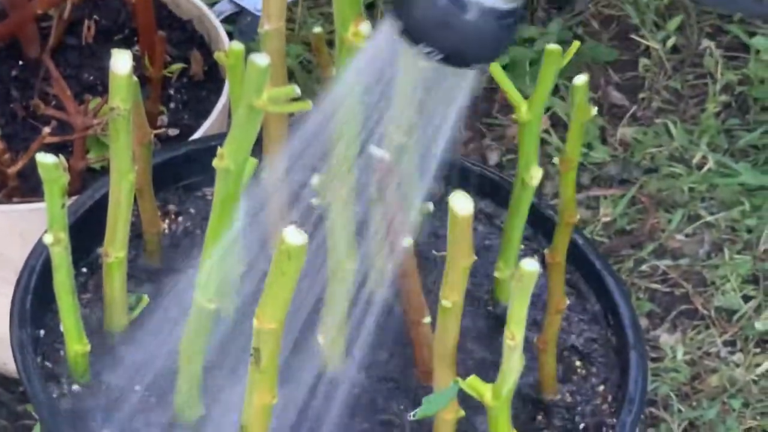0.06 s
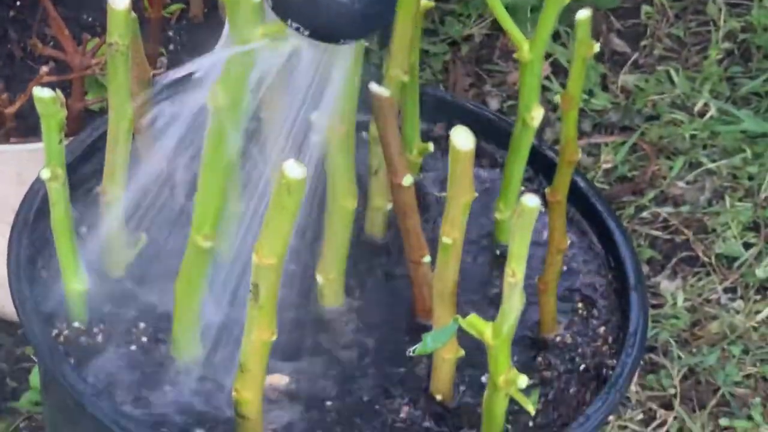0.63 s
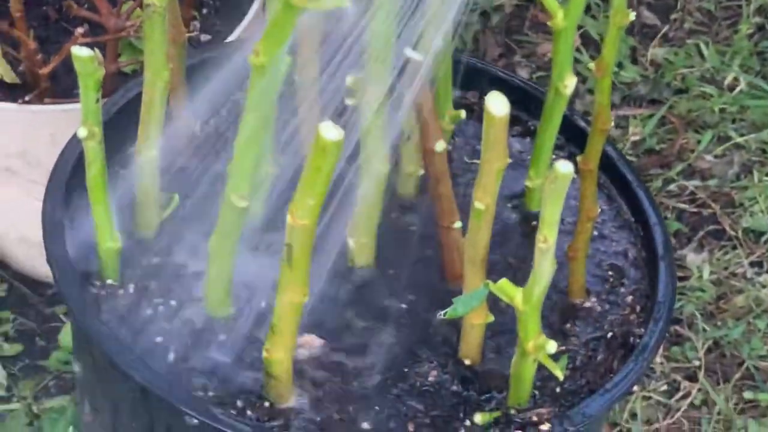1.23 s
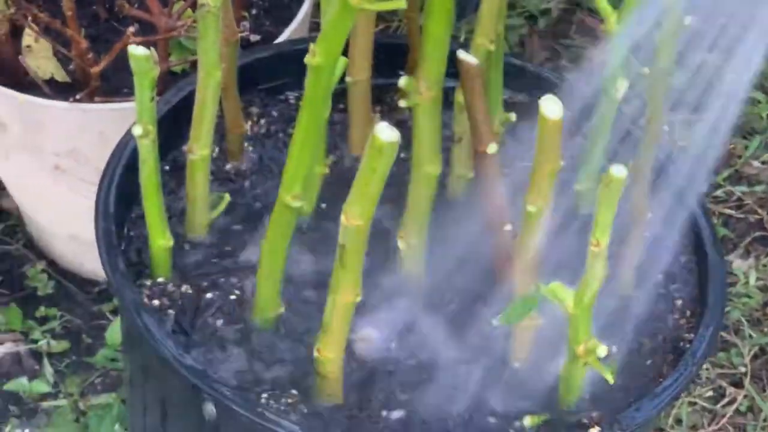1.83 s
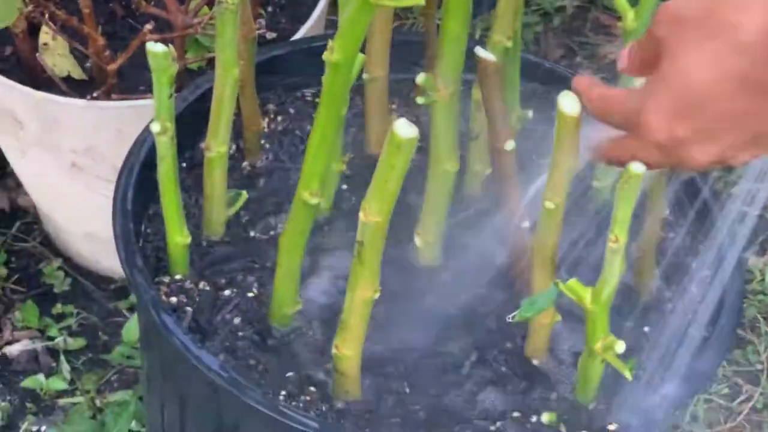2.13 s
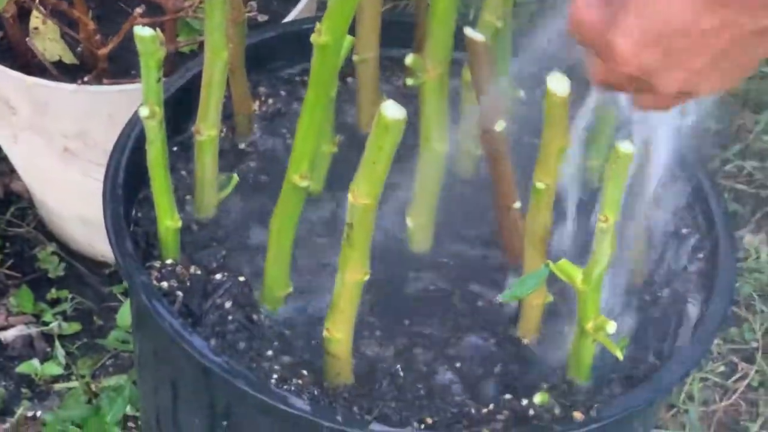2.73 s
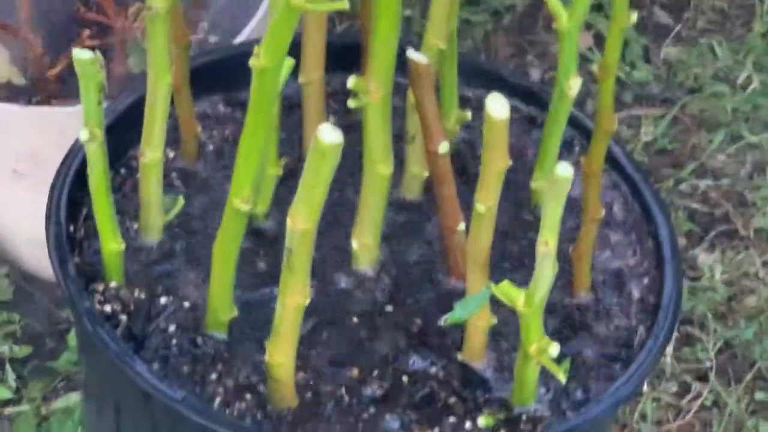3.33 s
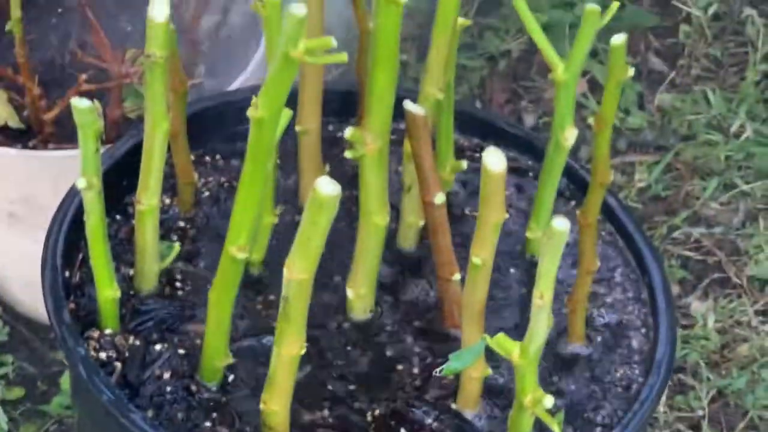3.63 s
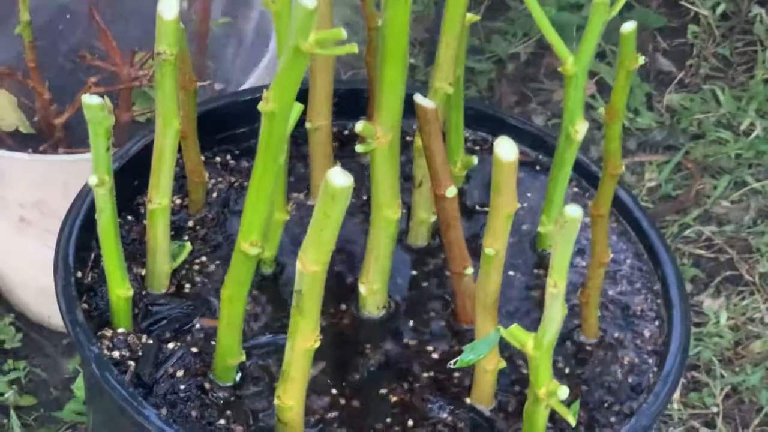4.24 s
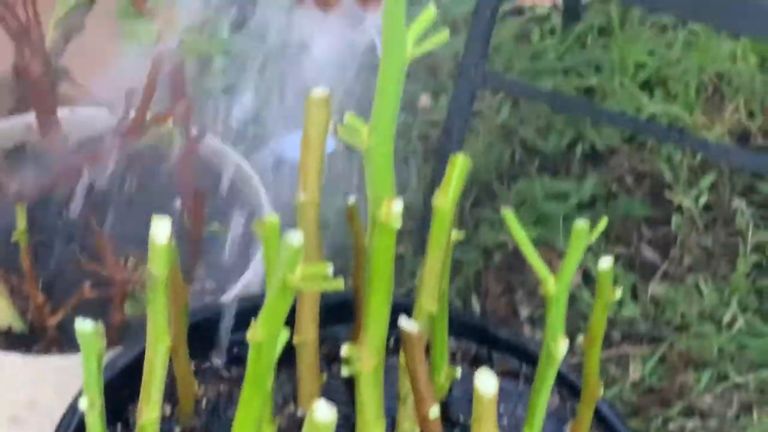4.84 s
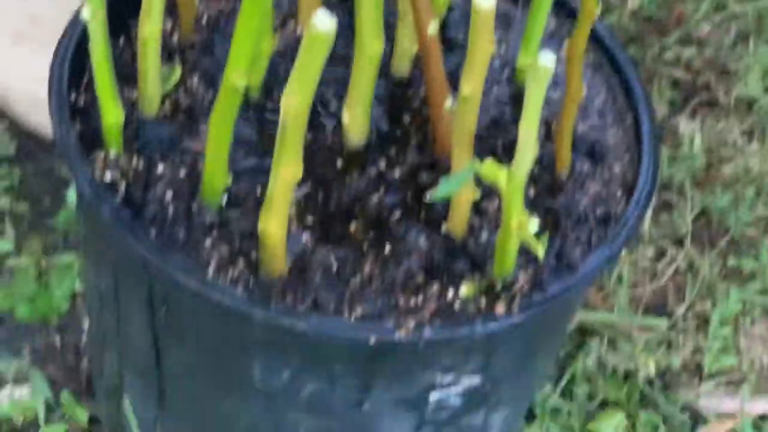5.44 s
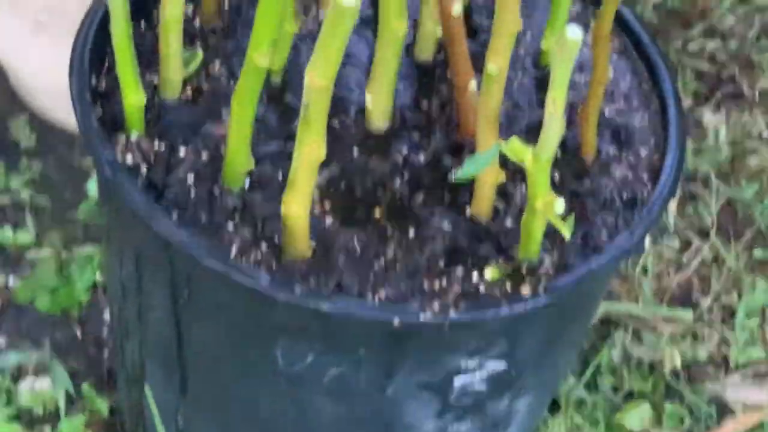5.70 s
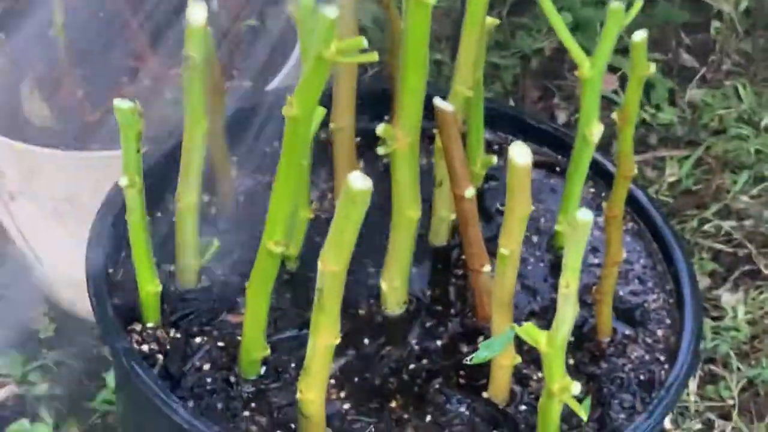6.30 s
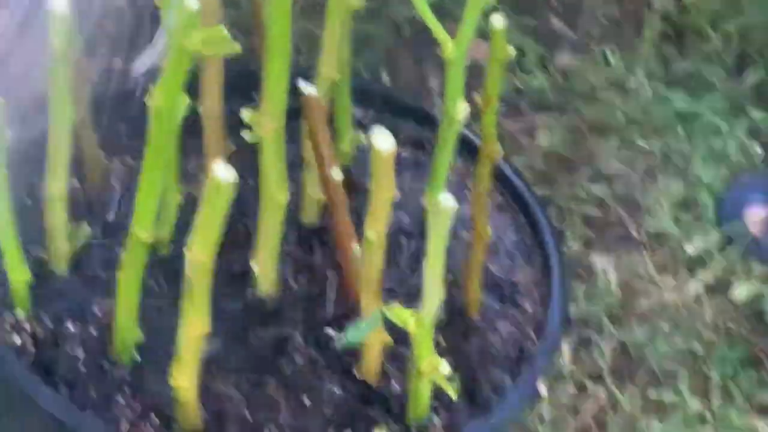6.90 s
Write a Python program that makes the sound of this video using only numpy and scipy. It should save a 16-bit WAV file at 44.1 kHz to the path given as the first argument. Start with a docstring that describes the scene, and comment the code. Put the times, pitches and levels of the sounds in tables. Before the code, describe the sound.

Outdoors, close to the microphone, a garden shower head sprays a plastic pot of plant cuttings with a bright hiss and a patter on wet soil. The water rings against the pot's wall, then gurgles and plops as it pools. About halfway the spray swings to a farther pot and softens, with short swishes and ticking drops, before growing a little again. Distant traffic and an engine hum faintly underneath.

```python
"""A garden shower head sprays a plastic pot of cuttings outdoors, over far traffic and an engine's drone.
From the start, fine drops hiss on stems and wet soil, and the pot's resonances colour their patter.
Towards 2 s the jets reach the wall, which rings; then pooling water gurgles and big drops plop.
At about 3.2 s the spray swings to a farther pot and softens, leaving a few plops behind.
From 5 s the engine fades, and swishes, as of jets crossing a rim or leaves, come more often."""
import sys
import numpy as np
from scipy import signal
from scipy.fft import rfft, irfft, next_fast_len
from scipy.io import wavfile
from scipy.ndimage import uniform_filter1d, map_coordinates

SR = 44100
rng = np.random.default_rng(int(sys.argv[2]) if len(sys.argv) > 2 else 0)


def bounce(signal):
    """Save signal as a 16-bit WAV file at the path given by the first command-line argument."""
    frames = np.transpose(np.atleast_2d(signal))
    limited = np.clip(frames, -1, 1)
    pcm = np.round(limited * 32767).astype(np.int16)
    wavfile.write(sys.argv[1], SR, pcm)


N = 311427

# the shower as the hand moves it: t/s, spray level/dB, splash re spray/dB, drumming re spray/dB
SHOWER = [(0.0, -27.5, -6, -18), (0.25, -26.3, -7.5, -13.5), (0.45, -28, -7, -15), (0.7, -28.0, -7, -17),
          (0.87, -30.5, -7, -14), (0.97, -28, -5, -15.5), (1.12, -27.5, -6, -16.5),
          (1.3, -28.0, -6.5, -12.5), (1.5, -27.5, -6, -15.5), (1.64, -29.0, -6.5, -15),
          (1.76, -27, -6.5, -18), (1.94, -27.5, -6.5, -17.5), (2.08, -29.5, -5.5, -17), (2.2, -30, -5, -14),
          (2.45, -29.5, -6, -13), (2.7, -30.5, -4, -11.5), (2.9, -31.5, -5.5, -12.5),
          (3.02, -31.5, -7.5, -20), (3.12, -33, -5.5, -12.5), (3.19, -39, -4, -15.5), (3.28, -37, -3, -17),
          (3.38, -39, -10.5, -15), (3.48, -41.5, -11, -14.5), (3.57, -38, -9.5, -8.5),
          (3.76, -36.5, -11, -14.5), (3.92, -35.5, -8.5, -13), (4.1, -36, -10, -14.5),
          (4.26, -34, -10.5, -17.5), (4.39, -34, -11.5, -17.5), (4.55, -37, -9.5, -16.5),
          (4.64, -39.5, -9.5, -13), (4.78, -34.5, -11.5, -19.5), (5.0, -34, -13, -16.5),
          (5.1, -36, -9, -19), (5.17, -41, -6.5, -10.5), (5.23, -40.5, -4.5, -13.5),
          (5.33, -38.5, -3.5, -13), (5.4, -43, -7.5, -7), (5.47, -40, -2.5, -11), (5.56, -43, -6, -12),
          (5.67, -36, -5, -15), (5.81, -36, -5.5, -12.5), (5.92, -32.5, -11, -18),
          (6.19, -32, -13.5, -18.5), (6.28, -32.5, -6, -15), (6.45, -30.5, -11, -17.5),
          (6.55, -34, -9.5, -17), (6.63, -31.5, -9.0, -17.5), (6.73, -36.5, -5.5, -16.5),
          (6.81, -35.5, -4.5, -21), (6.89, -38, -5, -16.5), (7.02, -32.5, -2, -17.5),
          (7.06, -33.5, -10, -7.5)]
# colour of a drop's tick: f/Hz, gain/dB
TICK_SPECTRUM = [(800, -22), (2000, -10), (4000, -6), (8000, -1), (12000, 0), (15000, -1)]
# stereo images of the near pot and of its wall: f/Hz, coherence (0-1), phase lead of left/rad
NEAR_POT_IMAGE = [(1100, .98, 0), (1550, .94, .4), (2000, .85, 1.1), (2450, .95, .1), (2880, .83, 3.5)]
WALL_IMAGE = [(3000, .6, 2.1), (4140, .92, .45), (5100, .45, 1.7), (6300, .65, .9), (7000, .97, 0),
              (7700, .9, -1.2), (8600, 1, -3.1)]


def amp(db):
    """Amplitude ratio of a level in decibels."""
    return 10 ** (np.asarray(db) / 20)


def unit(x):
    """Normalisation to rms 1."""
    return x / np.sqrt(np.mean(x ** 2) + 1e-20)


def curves(rows):
    """Linear interpolation in time: one value per sample for each column after t/s."""
    times, *columns = np.transpose(rows)
    return [np.interp(np.arange(N) / SR, times, column) for column in columns]


def wobble(rate):
    """Slow random modulation: a spline through rate Gaussian knots a second."""
    knots = rng.standard_normal(int(N * rate / SR) + 4)
    return map_coordinates(knots, [np.arange(N) * rate / SR])


def swell(middle_s, length_s):
    """A half-cosine envelope, rising from 0 to 1 and falling back."""
    return np.cos(np.pi * np.clip((np.arange(N) / SR - middle_s) / length_s, -.5, .5))


def add(track, start_s, sound):
    """Superposition of a sound on a track."""
    start = int(np.clip(round(start_s * SR), 0, N - 1))
    track[start:start + len(sound)] += sound[:N - start]


def filtered(x, response):
    """Linear filtering: the spectrum is multiplied by a complex frequency response."""
    size = next_fast_len(N + 8192)
    return irfft(rfft(x, size) * response(np.fft.rfftfreq(size, 1 / SR)), size)[..., :N]


def coloured(x, spectrum):
    """Spectral shaping by (f/Hz, gain/dB) points on a logarithmic frequency axis."""
    f, db = np.transpose(spectrum)
    return filtered(x, lambda hz: amp(np.interp(np.log(hz + 1), np.log(f), db)))


def resonant(x, centre_hz, width_hz):
    """Two equal resonators in cascade give a steep-sided band, at rms 1."""
    peak = signal.iirpeak(centre_hz, centre_hz / width_hz, SR)
    return unit(signal.lfilter(*peak, signal.lfilter(*peak, x)))


def patchy(pair, depth_db, bins=5, frames=16):
    """Spectral modulation: random gains, smooth in frequency and time, keep the colour shifting."""
    spectra = signal.stft(pair, nperseg=512)[2]
    field = uniform_filter1d(rng.standard_normal(spectra.shape[1:]), bins, 0)
    field = uniform_filter1d(field, frames, 1)
    return signal.istft(spectra * amp(depth_db * unit(field)), nperseg=512)[1][:, :N]


def stereo(pair, image):
    """Partial coherence: two independent signals mix into phase-shifted left and right, at rms 1."""
    f, coherence, phase = np.transpose(image)
    angle = lambda hz: np.arccos(np.clip(np.interp(hz, f, coherence), 0, 1)) / 2
    shift = lambda hz: np.exp(.5j * np.outer([1, -1], np.interp(hz, f, phase)))
    shared, apart = filtered(pair, lambda hz: np.array([np.cos(angle(hz)), np.sin(angle(hz))]))
    return unit(filtered(np.array([shared + apart, shared - apart]), shift))


def impacts(rate, spread_db):
    """Shot noise: two streams, each of about rate impacts a second, log-normal in size."""
    hits = rng.random((2, N)) < rate / SR
    return unit(hits * rng.choice([-1, 1], (2, N)) * amp(spread_db * rng.standard_normal((2, N))))


def bubbles(rate, centre_hz, cycles, spread_db):
    """Two streams of tiny bubbles: damped oscillators that glide up, losing 60 dB in about cycles."""
    t = np.arange(SR // 50) / SR
    starts = rng.integers(0, 2 * N, int(rate * N / SR) * 2)
    pitch, size = rng.standard_normal((len(starts), 2)).T[:, :, None]
    turns = centre_hz * np.exp(.35 * pitch) * t
    age = np.minimum(turns / cycles, 2)
    rings = amp(spread_db * size - 60 * age) * np.sin(2 * np.pi * turns * (1 + .27 * age))
    samples = starts[:, None] + np.arange(len(t))
    summed = np.bincount(samples.ravel(), rings.ravel(), 2 * N)
    return unit(summed[:2 * N].reshape(2, N))


def far_share():
    """Power crossfade: the share of the spray that has swung to the farther pot, 0-1."""
    middle_s, takes_s = 3.22, .17
    return np.clip(.5 + (np.arange(N) / SR - middle_s) / takes_s, 0, 1)


def wall_share():
    """Power crossfade: the share of the splash that comes from close to the pot's wall, 0-1."""
    aim = [(0, 0.02), (.9, .05), (1.6, 0.3), (1.78, .9), (2.9, .9), (3.15, 0.4), (3.6, 0.09), (7.06, 0.11)]  # where the jets land: t/s, share near the wall
    return np.clip(curves(aim)[0], 0, 1)


def drumming():
    """Amplitude modulation: the force of the drops on soil wavers with the hand."""
    spray_db, _, drumming_db = curves(SHOWER)
    return amp(spray_db + drumming_db + .7 * wobble(26))


def traffic():
    """Far traffic rumbles as broadband noise with most of its power at low frequencies."""
    spectrum = [(20, -18), (32, -21), (45, -5), (58, 0.5), (85, 0), (130, -8), (200, -14), (320, -19),
                (450, -17.5), (680, -21), (930, -13.5), (1500, -19), (4000, -32), (15000, -53)]  # f/Hz, relative level/dB
    image = [(70, 0.96, 0.25), (270, 0.9, 0.23), (547, 0.34, 0.38), (900, 0.83, 0.25), (2500, 0.091, 0.47)]  # f/Hz, coherence, phase lead of left/rad
    noise = patchy(rng.standard_normal((2, N)), depth_db=1.2, bins=3, frames=40)
    return amp(-49) * stereo(coloured(noise, spectrum), image)


def engine():
    """Periodic firing makes a distant engine drone; the unsteady tone barely swells, then fades."""
    peak_db, peak_s, rise_db_per_s, fall_db_per_s = -53, 4.95, .1, 6
    past_s = np.arange(N) / SR - peak_s
    level_db = peak_db + np.minimum(rise_db_per_s * past_s, -fall_db_per_s * past_s)
    firing_hz = 91 + 3.31 * wobble(9)
    return amp(level_db + .86 * wobble(10)) * np.sin(2 * np.pi * np.cumsum(firing_hz) / SR)


def stray_drops():
    """Small drops strike rims and stems at random: brief noise bursts, panned at constant power."""
    per_s, loudest_db, range_db, t60_s = 60, -30, 8, .004
    t = np.arange(SR // 100) / SR
    left, right = np.zeros((2, N))
    for moment, weakness, side in rng.random((int(per_s * N / SR), 3)):
        tick = amp(loudest_db - range_db * weakness - 60 * t / t60_s) * rng.standard_normal(len(t))
        add(left, moment * N / SR, np.sqrt(1 - side) * tick)
        add(right, moment * N / SR, np.sqrt(side) * tick)
    return coloured(np.array([left, right]), TICK_SPECTRUM)


def stem_snaps():
    """Heavy drops snap on a stem: a short impact has a broad spectrum."""
    strikes = [(1.056, -27), (1.117, -22), (3.557, -25.5), (3.813, -29), (4.202, -28), (4.762, -28),
               (4.991, -23.5), (5.411, -32), (5.506, -30), (5.608, -27.5), (7.022, -20)]  # t/s, level before colouring/dB
    t60_s = .006
    t = np.arange(SR // 8) / SR
    track = np.zeros(N)
    for start_s, db in strikes:
        add(track, start_s, amp(db - 60 * t / t60_s) * rng.standard_normal(len(t)))
    return coloured(track, TICK_SPECTRUM)


def plops():
    """Bubble resonance: a big drop traps air in a puddle, which rings down with rising pitch."""
    drops = [(1.924, -39, 1240, 0.053), (2.523, -31, 1560, 0.025), (2.709, -34, 1230, 0.03),
             (2.815, -32, 2010, 0.03), (2.878, -33, 1400, .02), (2.927, -30, 1710, 0.028),
             (3.128, -36, 2050, 0.035), (3.147, -32.5, 2140, 0.022), (3.173, -29, 2440, 0.026),
             (3.225, -34, 1510, 0.045), (3.554, -40, 1590, 0.08), (3.683, -36, 1680, 0.03),
             (3.892, -37, 2000, 0.025), (6.248, -35, 1370, .03)]  # t/s, level/dB, starting f/Hz, 60 dB decay time/s
    attack_s = .00027
    t = np.arange(SR // 8) / SR
    track = np.zeros(N)
    for start_s, db, hz, t60_s in drops:
        envelope = amp(db - 60 * t / t60_s) * (1 - np.exp(-t / attack_s))
        add(track, start_s, envelope * np.sin(2 * np.pi * hz * t * (1 + .16 * t / t60_s)))
    return track


def swishes():
    """Band-limited shot noise swells over a weak hollow tone, as of jets crossing rims and leaves."""
    sweeps = [(.94, .08, -41.5, 2700, 1400), (.95, .1, -41.5, 4900, 3000), (1.76, .05, -38, 5200, 3000),
              (2.16, .06, -43, 2450, 700), (2.71, .11, -50, 680, 450), (3.63, .22, -54, 1620, 700),
              (3.89, .1, -50, 1900, 1100), (5.26, .2, -45.5, 2400, 1100), (5.465, .11, -42, 2650, 850),
              (5.7, .22, -41, 2480, 1100), (5.865, .075, -41.3, 2800, 400), (6.1, .12, -50, 1200, 500),
              (6.27, .16, -49, 1320, 350), (6.62, .16, -51, 1320, 400), (6.96, .05, -43, 3000, 1500),
              (7.03, .1, -40, 5900, 1800)]  # middle t/s, duration/s, level/dB, centre f/Hz, resonator width/Hz
    image = [(700, .92, 0), (1400, .85, .7), (2200, .6, 3.8), (2750, .6, 4.7), (4500, .4, 4.2),
             (5830, .85, 6.4)]  # f/Hz, coherence, phase lead of left/rad
    splutter = stereo(impacts(rate=3500, spread_db=2) * amp(1.8 * wobble(80)), image)
    hollow = amp(-17) * resonant(splutter, centre_hz=896, width_hz=160)
    return sum(amp(db) * swell(middle_s, length_s) * (resonant(splutter, hz, width) + hollow)
               for middle_s, length_s, db, hz, width in sweeps)


def gurgle():
    """Many bubbles resonate in the water that pools in the near pot as the shower head comes close."""
    spectrum = [(700, -35), (950, -10), (1200, 0), (2400, 0), (2900, -15), (4500, -26)]  # f/Hz, gain/dB
    froth = coloured(bubbles(rate=750, centre_hz=1800, cycles=22, spread_db=2), spectrum)
    return amp(-44) * swell(middle_s=2.86, length_s=.85) * stereo(froth, NEAR_POT_IMAGE)


def far_pot():
    """After the swing, sparser drops land in clumps and excite the farther pot's resonances."""
    resonances = [(400, -5), (760, -6.5), (910, -2), (1030, -5.5), (1250, 2), (1450, -5.5), (1700, 1),
                  (1900, -0.5), (2250, 5.5), (2800, -2), (4000, -5.5), (5000, 3), (7000, -20)]  # f/Hz, gain/dB
    image = [(1190, 0.84, 0.78), (1940, 0.23, 1.93), (3040, 0.23, 2.7)]  # f/Hz, coherence, phase lead of left/rad
    gain = np.sqrt(far_share()) * amp(2.5) * drumming()
    drops = impacts(rate=1900, spread_db=3.1)
    drops += .35 * bubbles(rate=300, centre_hz=1745, cycles=20, spread_db=2)
    clumps = amp(1.3 * wobble(70))
    patter = patchy(clumps * drops, depth_db=1.6, frames=10)
    return gain * stereo(coloured(patter, resonances), image)


def near_pot():
    """Cavity resonance: impacts and bubbles on wet soil excite the hollow above it."""
    resonances = [(300, -24), (600, -13), (760, -19.5), (1000, -7.5), (1200, -1.5), (1420, -7),
                  (1730, -0.5), (1950, -6), (2330, 1.5), (2550, 0.5), (2800, -14.5), (4500, -22)]  # f/Hz, gain/dB
    top_hz, top_q, wall_loss = 2420, 9.3, .23  # the top resonance weakens as the jets near the wall
    gain = np.sqrt(1 - far_share()) * amp(2) * drumming()
    drops = impacts(rate=4500, spread_db=3)
    drops += .2 * bubbles(rate=900, centre_hz=1673, cycles=38.7, spread_db=1)
    patter = stereo(coloured(patchy(drops, depth_db=.78), resonances), NEAR_POT_IMAGE)
    top_mode = signal.lfilter(*signal.iirpeak(top_hz, top_q, SR), patter)
    return gain * (patter - wall_loss * wall_share() * top_mode)


def wall_ring():
    """The gap between soil and wall resonates; pitch and strength wander with the point of impact."""
    rings = [(1.87, .45, -46, 4000, 950), (1.93, .45, -42.5, 6550, 1100), (2.4, .5, -43, 4230, 440),
             (2.75, .35, -44, 4100, 650)]  # middle t/s, duration/s, level/dB, centre f/Hz, resonator width/Hz
    detune, flutter_db = .025, 2.2
    drops = stereo(impacts(rate=2700, spread_db=3), WALL_IMAGE)
    place = np.pi / 4 * (1 + np.tanh(wobble(12)))
    track = np.zeros((2, N))
    for middle_s, length_s, db, hz, width in rings:
        lower = np.cos(place) * resonant(drops, hz * (1 - detune), width)
        upper = np.sin(place) * resonant(drops, hz * (1 + detune), width)
        track += amp(db) * swell(middle_s, length_s) * unit(lower + upper)
    return amp(flutter_db * wobble(25)) * track


def soil_splash():
    """Coarse drops on open soil make shot noise, more diffuse and bubbly in the farther pot."""
    spectrum = [(1500, -20), (2800, -7), (3400, -2), (4200, 0), (5100, 0), (6200, -.5), (7500, -2),
                (8200, -5), (8800, -16), (10000, -22), (15000, -35)]  # f/Hz, relative level/dB
    near_image = [(2000, .6, 1.2), (2900, .9, 3), (3450, .7, 2.6), (4200, .7, 2.7), (5150, .92, 3.2),
                  (5950, .65, 3.6), (6600, .75, 2.7), (7400, .55, -.9), (8700, .95, -3.14)]  # f/Hz, coherence, phase lead of left/rad
    far_image = [(2000, .5, 1.2), (3200, .55, 3), (4100, .4, 3.3), (5300, .55, 3.7), (6400, .3, 3.9),
                 (7400, .45, 5.4), (8700, .95, 3.14)]  # same columns
    drops = impacts(rate=6500, spread_db=3.2)
    near = stereo(coloured(patchy(drops, depth_db=1.7, frames=6), spectrum), near_image)
    wet = impacts(rate=4500, spread_db=3.2)
    wet += .4 * bubbles(rate=400, centre_hz=4000, cycles=22, spread_db=2.5)
    far = stereo(coloured(patchy(wet, depth_db=1.6, frames=6), spectrum), far_image)
    return np.sqrt(1 - far_share()) * near + np.sqrt(far_share()) * far


def wall_splash():
    """Shot noise from beside the wall sounds hollower and reaches the left with a spectral notch."""
    spectrum = [(2000, -37), (2850, -8), (3400, -1.5), (4250, 0), (4700, -1.5), (5300, -3.5), (6800, -1),
                (7700, -7), (8300, -30), (10000, -50)]  # f/Hz, relative level/dB
    balance = [(3700, 0), (5000, -2.5), (5900, -4.5), (6700, -3), (7600, -2)]  # f/Hz, left minus right level/dB
    drops = patchy(impacts(rate=6000, spread_db=3.2), depth_db=1.7, frames=7)
    splash = stereo(coloured(drops, spectrum), WALL_IMAGE)
    f, difference_db = np.transpose(balance)
    return filtered(splash, lambda hz: amp(np.outer([.5, -.5], np.interp(hz, f, difference_db))))


def coarse_splash():
    """Incoherent sources add in power: the aim divides the splash between soil and wall."""
    spray_db, splash_db, _ = curves(SHOWER)
    soil = amp(1.43) * np.sqrt(1 - wall_share()) * soil_splash()
    wall = amp(-.24) * np.sqrt(wall_share()) * wall_splash()
    return amp(spray_db + splash_db + .8 * wobble(50)) * (soil + wall)


def fine_hiss():
    """Thousands of fine impacts merge into shot noise; its colour shifts as the jets find new surfaces."""
    spectrum = [(1500, -45), (3000, -22), (5000, -15), (6800, -11), (7600, -6), (8200, -1.5), (9500, -2.2),
                (11800, 0), (13000, -1.2), (14600, -2), (15600, -6)]  # f/Hz, relative level/dB
    image = [(3000, .5, 3), (5100, .65, 3.2), (6740, .6, .6), (8100, .85, -2), (8700, .99, -3.14),
             (11900, .995, -9.42), (15050, .995, -15.7)]  # f/Hz, coherence, phase lead of left/rad
    spray_db, _, _ = curves(SHOWER)
    drops = patchy(impacts(rate=17000, spread_db=3.1), depth_db=1.3, bins=9, frames=9)
    flutter_db = .5 * wobble(45) + .55 * wobble(220)  # the jets break up unevenly
    return amp(spray_db + .88 + flutter_db) * stereo(coloured(drops, spectrum), image)


def scene():
    """Free field: in the open air the sources superpose without reverberation."""
    background = traffic() + engine()
    single_drops = stray_drops() + stem_snaps() + plops()
    pots = gurgle() + far_pot() + near_pot() + wall_ring()
    spray = swishes() + coarse_splash() + fine_hiss()
    return background + single_drops + pots + spray


def record(dry):
    """Band limiting: an ideal low-pass filter removes everything above its cutoff."""
    cutoff_hz = 15720
    return filtered(dry, lambda hz: hz < cutoff_hz)


dry = scene()
out = record(dry)
bounce(out)
```